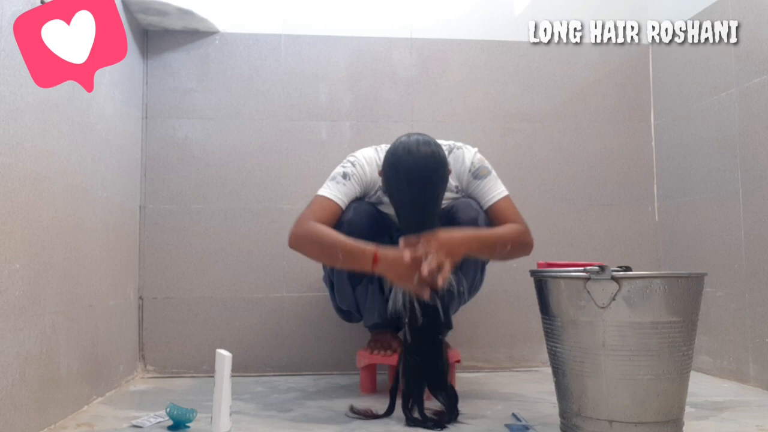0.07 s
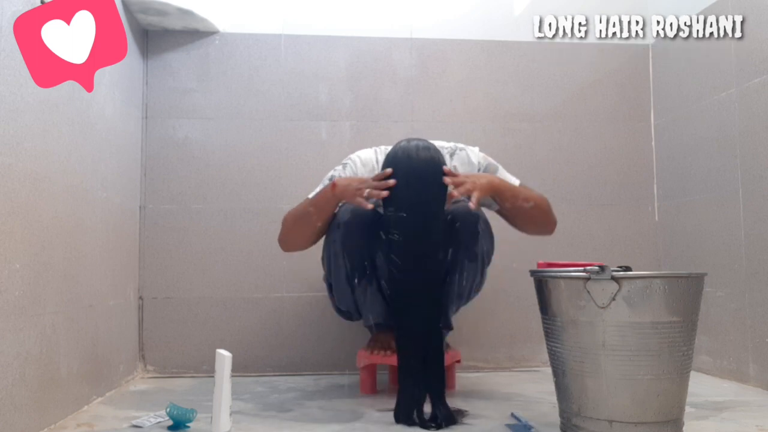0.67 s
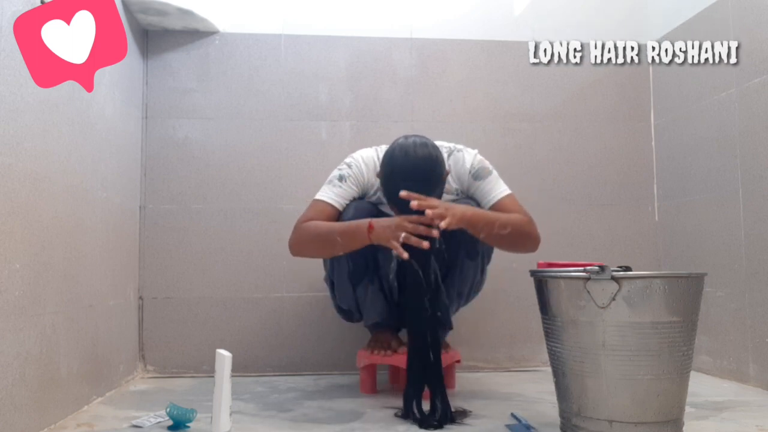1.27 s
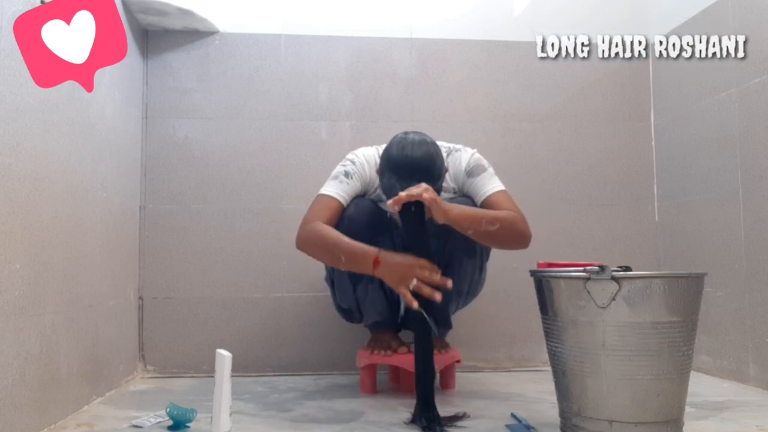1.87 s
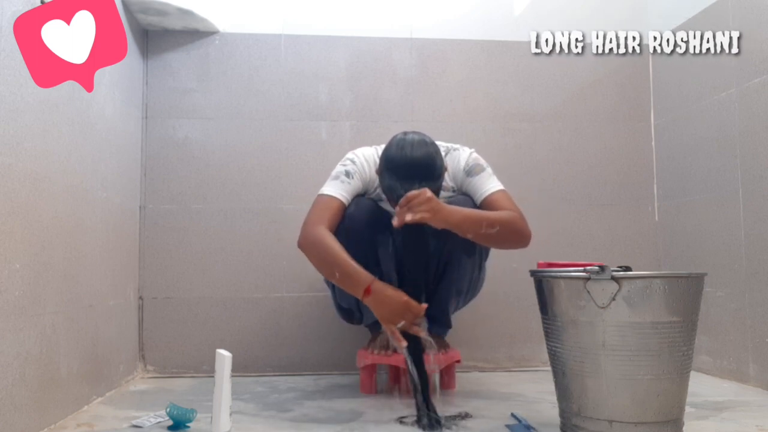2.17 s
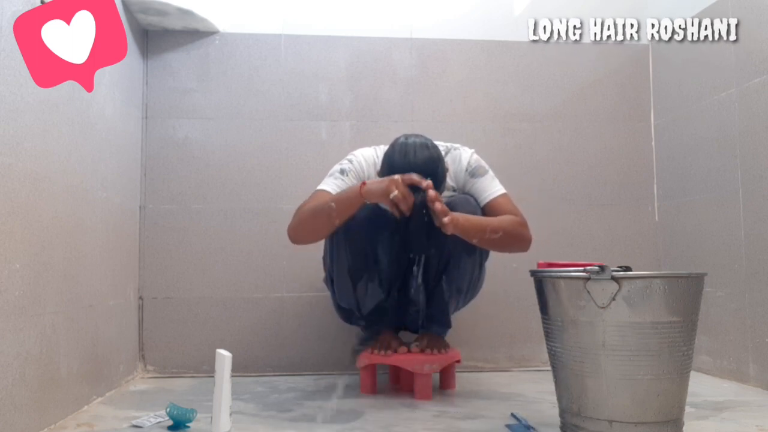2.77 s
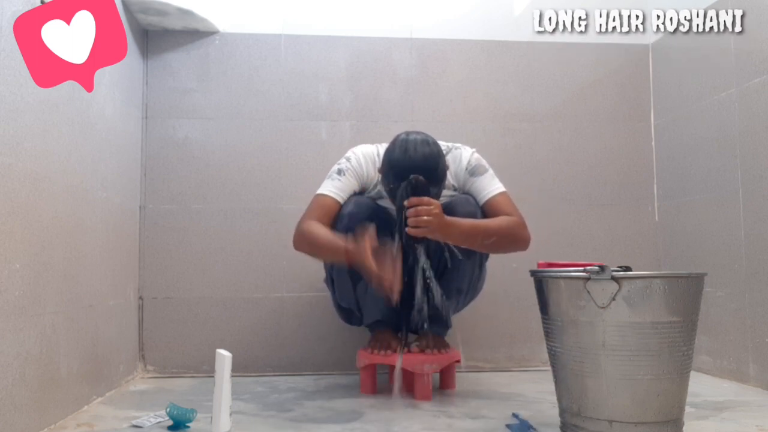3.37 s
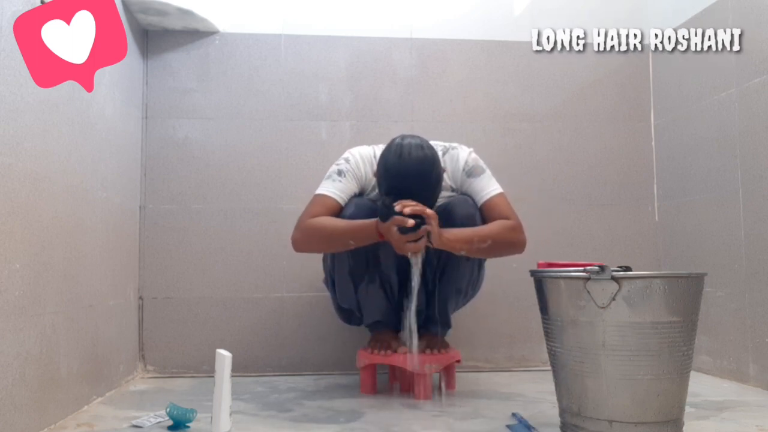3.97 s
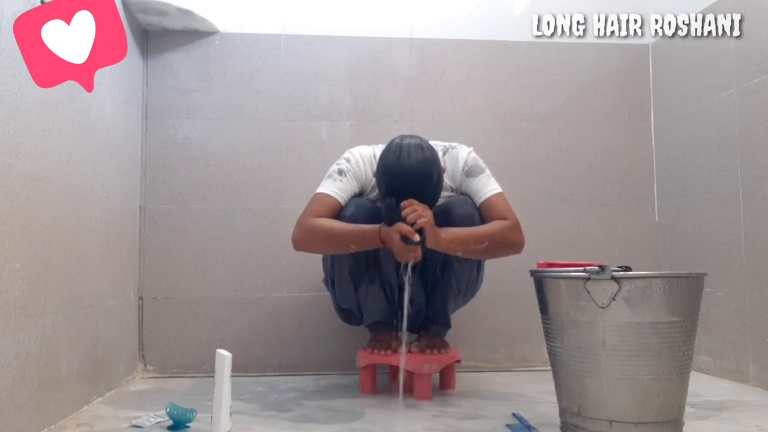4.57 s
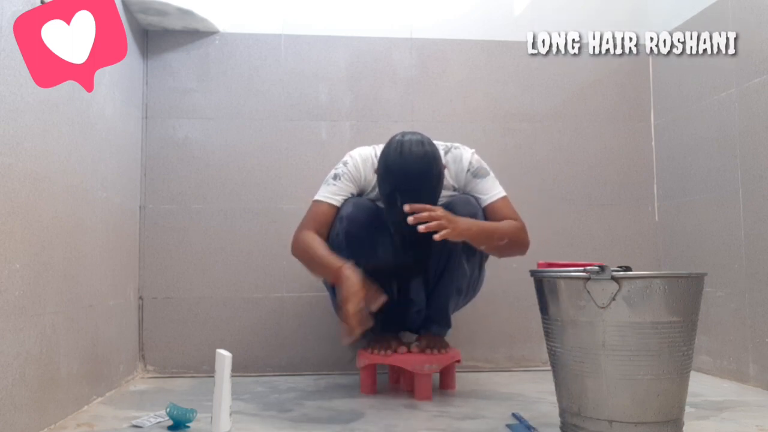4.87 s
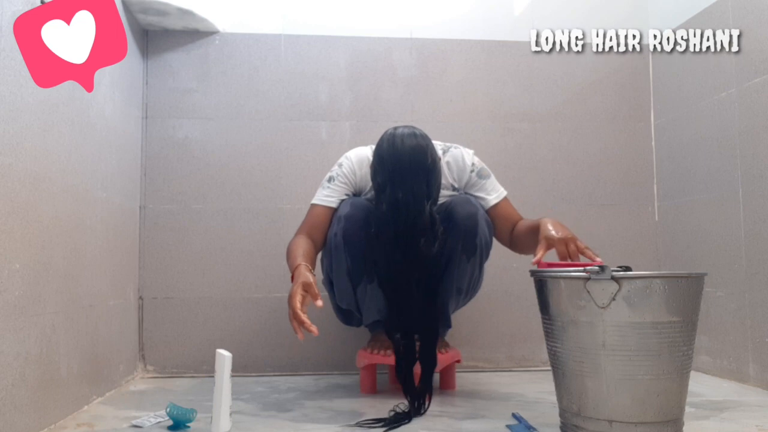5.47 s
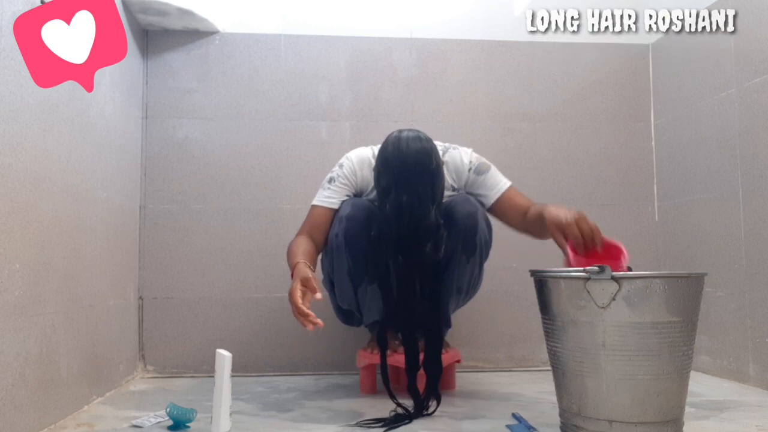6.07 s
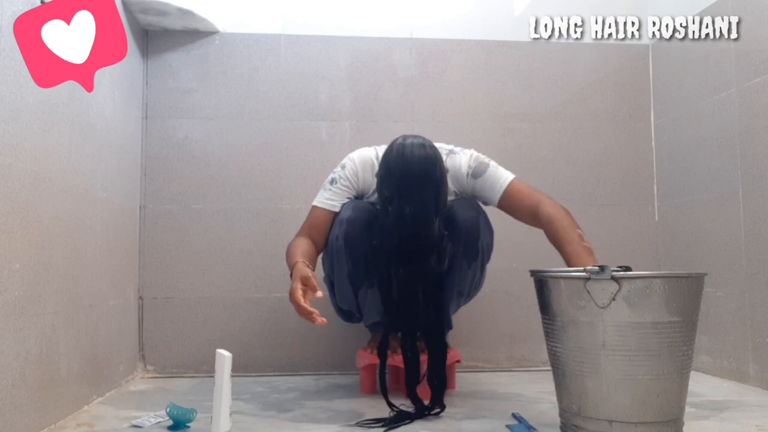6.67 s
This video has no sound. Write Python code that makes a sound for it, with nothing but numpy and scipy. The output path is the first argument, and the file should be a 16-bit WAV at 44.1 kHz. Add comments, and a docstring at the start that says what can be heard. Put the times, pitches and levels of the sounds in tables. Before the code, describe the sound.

A small, hard-walled bathroom echoes throughout, with a faint low hum underneath. It opens with a soft bump, and at about 0.3 seconds a splash of water from wet hair hits the floor. Light drips, plops and brief spatters follow until about 3 seconds. Then the hair is wrung harder: the water builds into a pattering stream with bright splashes and small squelches, strongest from about 3.5 to 4.7 seconds. Two last spatters land around 5 seconds, and the dripping thins out. After a dull rub at 5.6 seconds, a plastic mug knocks sharply on the rim of a steel bucket at 5.8 seconds, and the metal rings for about a second. At 6.4 seconds the mug plunges into the water with a hollow, resonant gulp, the loudest sound, followed by a smaller gulp and a light splash.

```python
"""Water wrung from wet hair lands on the floor of a hard, ringing bathroom: spray, patter and heavy
slaps, each a shower of clicks, with tiny bubbles and single plops. A plastic mug knocks on the rim
of a steel bucket, ringing its wall, then plunges into the water inside, ringing the air above it.
Behind it all the small room drones faintly at its lowest resonances."""
import sys
import numpy as np
from scipy import signal
from scipy.fft import rfft, irfft
from scipy.io import wavfile

SR = 44100
rng = np.random.default_rng(int(sys.argv[2]) if len(sys.argv) > 2 else 0)


def generate_wav(signal):
    """Clip the signal to [-1, 1] and save it as 16-bit WAV at the path in sys.argv[1]."""
    frames = np.transpose(np.atleast_2d(signal))
    scaled = np.clip(frames, -1, 1) * 32767
    pcm = np.round(scaled).astype(np.int16)
    wavfile.write(sys.argv[1], SR, pcm)


N = 296352
TIME = np.arange(N) / SR


def amp(db):
    """Decibels to gain."""
    return 10 ** (np.asarray(db) / 20)


def unit(x):
    """Scale to rms 1."""
    return x / np.sqrt(np.mean(abs(x) ** 2) + 1e-20)


def unit_energy(x):
    """Scale to the energy of 10 ms at rms 1."""
    return x * np.sqrt(SR / 100 / np.sum(x ** 2))


def at_hz(points, hz):
    """Interpolate on a log-frequency axis."""
    point_hz, value = np.transpose(points)
    return np.interp(np.log(hz + 1), np.log(np.sort(point_hz) + 1), value)


def add(mix, start_s, sound):
    """Mix in a sound at start_s."""
    part = mix[max(round(start_s * SR), 0):][:len(sound)]
    part += sound[:len(part)]


def colour(x, spectrum, tilt_db_per_oct=0, size=4096):
    """Minimum-phase filter, tilted about 1 kHz; clicks keep sharp fronts."""
    hz = abs(np.fft.fftfreq(size, 1 / SR))
    octaves = np.log2(np.maximum(hz, 300) / 1000)
    log_gain = np.log(amp(at_hz(spectrum, hz) + tilt_db_per_oct * octaves))
    taps = np.fft.ifft(np.exp(np.conj(signal.hilbert(log_gain)))).real
    return signal.oaconvolve(x, taps)[:len(x)]


def wander(width_hz):
    """Slow complex noise, rms 1."""
    hz = np.fft.fftfreq(N, 1 / SR)
    noise = rng.standard_normal(N) + 1j * rng.standard_normal(N)
    return unit(np.fft.ifft(np.fft.fft(noise) * np.exp(-(hz / width_hz) ** 2)))


def impacts(per_s, spread_db, samples=N):
    """Random clicks, many small, few large."""
    size = amp(spread_db * np.minimum(rng.exponential(1, samples), 4))
    return size * rng.choice([-1, 1], samples) * (rng.random(samples) < per_s / SR)


# Diffuse field: freq_hz, left_right_correlation
COHERENCE = [(80, 1), (200, 0.28), (400, 0.49), (800, 0.08), (1300, -0.12), (3000, 0.027), (15000, 0.049)]

def diffuse(a, b):
    """Two independent signals become a diffuse field at two close microphones."""
    correlation = np.clip(at_hz(COHERENCE, np.fft.rfftfreq(len(a), 1 / SR)), -1, 1)
    mid = rfft(a) * np.sqrt((1 + correlation) / 2)
    side = rfft(b) * np.sqrt((1 - correlation) / 2)
    return irfft(np.array([mid + side, mid - side]), len(a))


# Background noise: freq_hz, level_db
AIR = [(20, -7), (55, 0), (100, 14), (125, 16), (142, 2), (165, 17.5), (220, 4), (330, 3), (700, -7.5),
       (1100, -6.5), (1800, -35), (5000, -27), (15000, -32)]
# Standing waves: pitch_hz, level_db, unsteady_share
ROOM_MODES = [(82.5, 0, 0.11), (188.4, -14, 0.56)]
# Drone swell: time_s, level_db
DRONE_SWELL = [(0.0, -45), (0.55, -49.5), (0.75, -62), (0.9, -51), (1.76, -49), (1.92, -56.5), (2.2, -43.5),
               (2.68, -48.5), (3.15, -41), (3.58, -39), (4.28, -46), (4.72, -42), (5.22, -46.5),
               (5.38, -53), (5.52, -44.5), (6.02, -39), (6.3, -46.5), (6.46, -38)]

def ambience(air_db, drone_db):
    """The room's standing waves over faint noise that partly swells with them."""
    swell = amp(np.interp(TIME, *np.transpose(DRONE_SWELL)) + drone_db)
    drone = np.zeros(N)
    for hz, db, unsteady in ROOM_MODES:
        waver = 1 - unsteady + unsteady * wander(width_hz=4.9)
        drone += amp(db) * (waver * np.exp(2j * np.pi * hz * TIME)).real
    air = unit(diffuse(*(colour(noise, AIR) for noise in rng.standard_normal((2, N)))))
    return swell * np.sqrt(2) * drone + air * (amp(air_db) + amp(-12.5) * swell)


# Reverberation: freq_hz, t60_s
ROOM_DECAY = [(100, 1.4), (400, 1.21), (900, 1.14), (1800, 0.74), (4500, 0.65), (12000, 0.45),
              (16000, 0.58)]
# First wall reflections: delay_s
WALL_DELAYS_S = np.array([.0021, .0047, .0068, .0095, .0128, .0171])

def room(x, direct_db, early_db, left_lag_s, wall_scale=1, direct_delay_s=0):
    """Direct sound, close-wall reflections, then a tail that dies faster in the treble."""
    echoes = rng.choice([-1., 1.], (2, SR)) * (rng.random((2, SR)) < 6000 / SR)
    hz, t, spectra = signal.stft(diffuse(*echoes), SR, nperseg=256)
    spectra = spectra * amp(-60 * t / at_hz(ROOM_DECAY, hz)[:, None])
    tail = signal.istft(spectra, SR)[1][:, :SR] * np.minimum(TIME[:SR] / 0.0057, 1)
    response = tail / np.linalg.norm(tail[0])
    for channel, delay_s in zip(response, (direct_delay_s + left_lag_s, direct_delay_s)):
        channel[round(delay_s * SR)] += amp(direct_db)
        early_s = WALL_DELAYS_S * wall_scale + rng.uniform(0, 0.0008, len(WALL_DELAYS_S))
        channel[np.round(early_s * SR).astype(int)] += amp(early_db)
    return signal.oaconvolve(x[None], response / np.linalg.norm(response[0]), axes=1)[:, :N]


def blows(events, spectrum, modes, ring_db, swell_s):
    """Rough contact bursts and the modes they excite: returns (noise, ring)."""
    noise, ring, t = np.zeros(N), np.zeros(N), TIME[:SR]
    for start_s, db, rise_s, decay_s, tilt_db_per_oct, ring_offset_db in events:
        force = np.minimum(t / rise_s, 1) * np.exp(-np.maximum(t - rise_s, 0) / decay_s)
        contact = force * impacts(per_s=4000, spread_db=5.0, samples=len(t))
        add(noise, start_s, amp(db) * unit_energy(colour(contact, spectrum, tilt_db_per_oct)))
        tones = sum(amp(mode_db - 60 * t / t60_s) * np.sin(2 * np.pi * (hz * t + rng.random()))
                    for hz, mode_db, t60_s in modes)
        tones *= 1 - np.exp(-t / swell_s)
        add(ring, start_s, amp(db + ring_offset_db + ring_db) * unit_energy(tones))
    return noise, ring


# Bumps and rubs: start_s, level_db, rise_s, decay_s, tilt_db_per_oct, ring_offset_db
BUMPS = [(0.0, -25.5, 0.00073, 0.025, -1, -10.5), (5.574, -32.5, 0.0058, 0.17, -2.1, -19),
         (5.685, -35.5, 0.0086, 0.1, 4, -19)]
# Dull contact: freq_hz, level_db
THUD = [(60, -29), (180, -18), (245, -11), (275, -23), (310, 3), (410, 4), (620, -4), (700, -0.5), (890, 2),
        (970, -6), (1300, -5), (1700, -12), (4400, -25.5), (12000, -57)]
# Steel wall, also rung by rim_knocks: pitch_hz, level_db, t60_s
BUCKET_MODES = [(318, -7.5, 1), (339, 3, 1.04), (367, -18, 1.8), (668, -5, 1.1), (836, -8.5, 1.2),
                (844, -11, 0.95), (1174, -26, 0.92), (1216, -20, 2.1), (1286, -6.5, 0.84), (1470, -9, 0.72),
                (1530, -37, .9), (1940, -6.5, 0.85), (2400, -30, 0.69)]

def bumps():
    """Dull bumps and rubs barely stir the bucket's wall."""
    return blows(BUMPS, THUD, BUCKET_MODES, ring_db=-14, swell_s=0.018)


# Mug on rim: start_s, level_db, rise_s, decay_s, tilt_db_per_oct, ring_offset_db
KNOCKS = [(5.787, -18.5, 0.023, 0.017, -1, 3), (5.821, -10, .003, 0.024, -0.25, -12)]
# Plastic on steel: freq_hz, level_db
SCRAPE = [(60, -35), (270, -17), (330, 6), (480, -6.5), (800, 0.5), (1080, -3), (1260, 8), (1600, -2),
          (2400, 2), (3100, -6), (4700, -3.5), (7000, -12.5), (9000, -18), (15000, -24)]

def rim_knocks():
    """The mug strikes the rim and the steel wall rings."""
    return blows(KNOCKS, SCRAPE, BUCKET_MODES, ring_db=-3.5, swell_s=0.028)


# Plunge and gulps: start_s, level_db, rise_s, decay_s, tilt_db_per_oct, ring_offset_db
PLUNGES = [(6.412, -6.5, 0.0071, 0.019, -0.5, 1.5), (6.445, -9, 0.0033, 0.043, 0.8, -6.5),
           (6.565, -18, 0.0065, 0.034, 1, -3)]
# Gulping water: freq_hz, level_db
GULP = [(50, -42.5), (145, -13.5), (187, -9), (270, -18), (305, -0.5), (430, -4), (620, 1), (690, -1.5),
        (735, -13.5), (1100, -13), (1300, -9.5), (2100, -14.5), (2900, -22), (4500, -24.5), (12000, -50)]
# Air in mug and bucket: pitch_hz, level_db, t60_s
CAVITY_MODES = [(185.6, -8.5, 2.4), (301.7, -1, 1.3), (344, -1, 1.5), (361, -2, 0.66), (489, -10, 2.1),
                (539, -13, 0.82), (606, 7, 0.53), (677, 11.5, 0.3), (836, -12, 1.2), (938, -5.5, 0.89),
                (1198, -4, 0.52)]

def mug_plunge():
    """The mug goes under; water gulps and the air above it rings."""
    return blows(PLUNGES, GULP, CAVITY_MODES, ring_db=-3.5, swell_s=0.0059)


# Steady run off the hair: time_s, level_db
FLOW = [(0.0, -46), (1.05, -58), (1.55, -53.5), (2.08, -59.5), (2.3, -46), (2.7, -52.5), (3.1, -39),
        (3.7, -31.5), (4.3, -29), (4.69, -26), (4.82, -47), (5.22, -51), (5.36, -70), (5.55, -63.5),
        (5.76, -75)]

def flow_db(time_s):
    """Level of the running water, greatest while the hair is wrung."""
    return np.interp(time_s, *np.transpose(FLOW))


def stray_drops(per_s=6.3, low_hz=2550, high_hz=7400, width_ratio=0.19, decay_s=0.004):
    """Lesser random drops that follow the flow's level; rows as in DROPS."""
    when, size, strength = rng.random((round(per_s * N / SR), 3)).T
    start_s = when * N / SR
    hz = low_hz * (high_hz / low_hz) ** size
    db = flow_db(start_s) + 3.5 + 7 * (2 * strength - 1)
    return list(zip(start_s, db, hz, width_ratio * hz, np.full(len(hz), decay_s)))


# Plops, spits and squelches: start_s, level_db, pitch_hz, width_hz, decay_s
DROPS = [(0.173, -33, 12300, 8000, 0.0017), (0.201, -23, 4300, 1900, 0.014),
         (0.352, -23, 3200, 1850, 0.031), (0.771, -36.5, 2920, 1300, 0.0045),
         (0.819, -34, 4830, 1896, 0.0048), (1.298, -49, 4400, 1800, 0.0091),
         (1.406, -39, 8900, 8800, 0.0034), (1.435, -47, 2430, 500, 0.016), (1.648, -29.5, 5060, 564, 0.045),
         (1.755, -33.5, 4370, 180, 0.0073), (2.143, -45, 4120, 4900, 0.0065),
         (2.168, -32, 8450, 8000, 0.0043), (2.423, -30.5, 10900, 3200, 0.0046),
         (2.568, -39, 12400, 1370, 0.0055), (2.656, -45.5, 2520, 450, 0.028),
         (2.738, -31, 5760, 2800, 0.0023), (2.737, -32, 7200, 400, 0.0045), (2.877, -44, 4070, 350, .006),
         (3.025, -32, 2990, 700, 0.017), (3.128, -30, 3460, 700, 0.0032), (3.236, -27, 2150, 350, 0.0068),
         (3.328, -33, 3480, 450, 0.0078), (3.366, -26.5, 4800, 1000, 0.027), (3.459, -34, 4170, 300, .0056),
         (3.539, -21, 3600, 1900, 0.02), (3.774, -19, 3090, 1840, .011), (3.972, -25.5, 4730, 800, 0.0037),
         (4.104, -17, 8260, 11300, 0.0029), (4.135, -18.5, 4200, 1510, 0.023),
         (4.215, -19, 4430, 2320, 0.0054), (4.385, -21.5, 3500, 1000, .016),
         (4.478, -24.5, 1810, 450, 0.0061), (4.86, -27, 4130, 2200, 0.0066),
         (5.036, -28.5, 11100, 9000, 0.0043), (5.059, -32.5, 2150, 450, 0.015),
         (5.207, -42.5, 4100, 900, 0.0066), (5.421, -46.5, 10900, 7000, 0.0028),
         (5.59, -46, 6350, 700, .06), (5.766, -35.5, 5100, 500, 0.037), (6.569, -29.5, 9360, 1000, 0.0078)]

def plops():
    """Each drop or squeeze is a tick and a crackle, ringing in an air pocket or water film."""
    out, t = np.zeros(N), TIME[:SR // 4]
    for start_s, db, hz, width_hz, decay_s in DROPS + stray_drops():
        swell = 1 - np.exp(-t / (0.36 * decay_s))
        burst = unit_energy(rng.standard_normal(len(t)) ** 3 * swell * np.exp(-t / decay_s))
        burst[0] += np.linalg.norm(burst) * 1.47 * np.exp(-decay_s / 0.012)  # tick, weak in slow ones
        band_hz = np.clip([hz - width_hz / 2, hz + width_hz / 2], 500, 0.45 * SR)
        ring = signal.sosfilt(signal.butter(2, band_hz, "bandpass", fs=SR, output="sos"), burst)
        add(out, start_s, amp(db) * unit_energy(ring))
    return out


def bubbles(per_s, spread_db, decay_cycles, chirp, low_hz=1700, high_hz=7500):
    """Tiny trapped bubbles ring briefly, rising in pitch."""
    out, t = np.zeros(N), TIME[:SR // 50]
    for when, size, strength in rng.random((round(per_s * N / SR), 3)):
        hz = low_hz * (high_hz / low_hz) ** size
        age = hz * t / decay_cycles
        ring = np.sin(2 * np.pi * hz * t * (1 + chirp * age)) * np.exp(-age)
        gain = np.sqrt(hz) * amp(spread_db * min(-np.log(strength), 4))
        add(out, when * N / SR, gain * ring)
    return unit(out)


def roaming(x, sweeps_per_s, spots=3):
    """The landing point roams over floor spots, each with its own path through the room."""
    angle = np.pi * sweeps_per_s * TIME
    out = np.zeros((2, N))
    for k in range(spots):
        share = np.sqrt(2 / spots) * np.cos(angle + np.pi * k / spots)
        out += room(x * share, direct_db=-8.5, early_db=-13.5, left_lag_s=0.00008 * (k + 1),
                    wall_scale=1 + 0.15 * k, direct_delay_s=0.00032 * k)
    return out


def gout(start_s, rise_s, hold_s, decay_s):
    """Envelope of a gout of water: gathers, keeps landing, dies away."""
    age_s = TIME - start_s
    return np.clip(age_s / rise_s, 0, 1) ** 2 * np.exp(-np.maximum(age_s - rise_s - hold_s, 0) / decay_s)


# Water flung, squeezed or scooped: start_s, spray_db, rise_s, hold_s, patter_offset_db, slap_offset_db
GOUTS = [(0.25, -26, 0.098, .11, -2, -14), (0.717, -39.5, 0.043, 0.029, -2, -21),
         (1.18, -52.5, 0.009, 0.11, -20, -29), (1.438, -44, 0.028, .01, -17, -27),
         (1.701, -40.5, 0.01, 0.023, -5, -16), (2.152, -32, 0.031, 0.084, -3, -26),
         (2.366, -35.5, 0.023, .01, -3.5, -34), (2.844, -45, 0.021, 0.017, 1.5, -17),
         (2.987, -36, 0.02, 0.097, -0.5, -16), (3.182, -45.5, 0.02, 0.053, 10.5, -1),
         (3.33, -30, 0.036, 0.011, -6, -16), (3.538, -18.5, 0.03, 0.0083, -2, -22.5),
         (3.693, -39.5, 0.015, 0.079, 9, -1.5), (3.88, -37, .035, 0.011, 8, 1),
         (4.077, -20, 0.039, .008, -5, -18), (4.292, -21.5, .035, 0.034, -11, -21.5),
         (4.382, -28, 0.026, 0.15, 2, -15), (4.851, -25.5, 0.022, 0.0044, -10, -38),
         (5.03, -28.5, 0.0045, 0.013, -6, -12), (6.304, -38, 0.021, 0.054, -1, -2),
         (6.542, -36.5, 0.021, .15, 3, -7)]

def landing_gains(full_flow_db=-28.5, patter_lag_s=0.0013, slap_lag_s=0.0079):
    """Spray, patter and slap gains: flow plus gouts, summed in power. Spray lands first."""
    relative_db = flow_db(TIME) - full_flow_db
    steady_db = np.array([relative_db, 1.02 * relative_db - 5.5, 0.63 * relative_db - 21.5])
    spray, patter, slap = amp(full_flow_db + steady_db) ** 2
    for start_s, db, rise_s, hold_s, patter_db, slap_db in GOUTS:
        spray += (amp(db) * gout(start_s, rise_s, hold_s, decay_s=0.029)) ** 2
        patter += (amp(db + patter_db) * gout(start_s + patter_lag_s, rise_s, hold_s, decay_s=0.029)) ** 2
        slap += (amp(db + slap_db) * gout(start_s + slap_lag_s, rise_s, hold_s, decay_s=0.027)) ** 2
    return np.sqrt([spray, patter, slap])


# Fine, medium and heavy water on the floor: freq_hz, level_db
SPRAY = [(200, -56), (3000, -30), (5500, -2), (7000, 3), (8200, -1), (9300, 1.5), (11000, 1.5), (15500, -1)]
PATTER = [(200, -71), (1500, -22.5), (2000, -7), (3000, -5.5), (4200, 1.5), (5200, 0.5), (7000, -9.5),
          (15500, -36.5)]
SLAP = [(60, -35), (200, -5), (400, -6.5), (750, -4), (1100, 3.5), (1400, 3.5), (2000, -14), (3500, -2.5),
        (15500, -44)]

def falling_water():
    """Three sizes of water land as showers of clicks; the drops also trap bubbles."""
    spray_gain, patter_gain, slap_gain = landing_gains()
    drops = unit(impacts(per_s=600, spread_db=4.5))
    mist = unit(impacts(per_s=5000, spread_db=1.5))
    fizz = bubbles(per_s=800, spread_db=3.5, decay_cycles=10, chirp=0.015)
    spray = unit(colour(drops + 0.18 * mist, SPRAY))
    patter = unit(colour(drops + 0.15 * mist + 1.27 * fizz, PATTER))
    slap = unit(colour(impacts(per_s=900, spread_db=5.5), SLAP))
    return spray_gain * spray + patter_gain * patter + slap_gain * slap


def scene():
    """Falling water and the bucket beside it, in one room."""
    scrape, wall_ring = rim_knocks()
    thud, faint_ring = bumps()
    gulp, air_ring = mug_plunge()
    ring = wall_ring + faint_ring + air_ring
    shower = roaming(falling_water(), sweeps_per_s=4.3)
    drips = room(plops(), direct_db=-3.5, early_db=-13, left_lag_s=0.00005)
    bucket = room(scrape + thud + gulp + 0.5 * ring, direct_db=-6.0, early_db=-19, left_lag_s=0.00024)
    direct_ring = ring * amp([[-0.5], [-2.5]])
    return ambience(air_db=-61.0, drone_db=0.5) + bucket + direct_ring + drips + shower


# Microphone balance: freq_hz, left_minus_right_db
BALANCE = [(100, -0.2), (380, 2.5), (700, .5), (2400, -1), (4400, 0.4), (6500, 0), (8500, -6.5),
           (11000, -4), (15000, -2)]

def record(dry):
    """Two microphones of unequal colour, then a low-pass."""
    balance_db = at_hz(BALANCE, np.fft.rfftfreq(N, 1 / SR))
    heard = irfft(rfft(dry) * amp(np.outer([0.5, -0.5], balance_db)), N)
    lowpass = signal.firwin(511, cutoff=15650, window=("kaiser", 9), fs=SR)
    return signal.oaconvolve(heard, lowpass[None], "same")


dry = scene()
out = record(dry)
generate_wav(out)
```